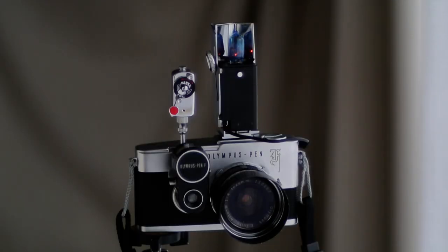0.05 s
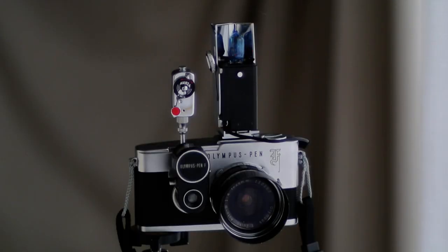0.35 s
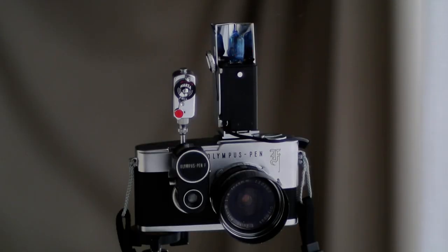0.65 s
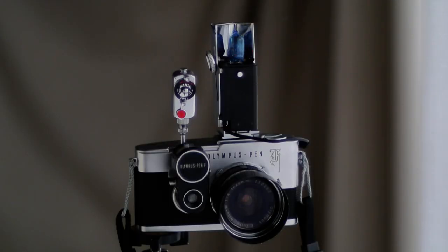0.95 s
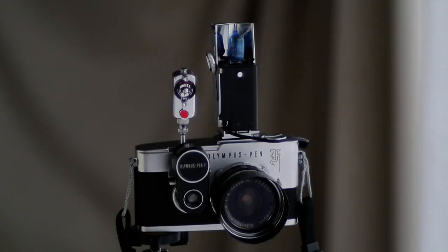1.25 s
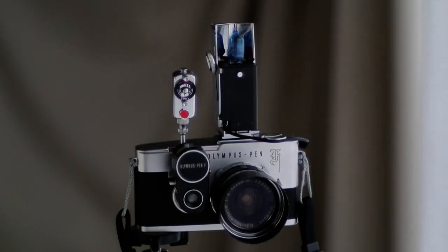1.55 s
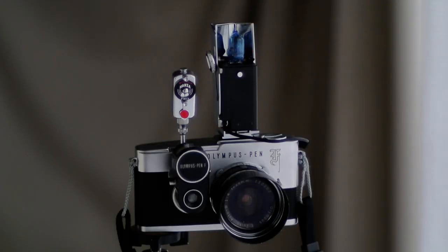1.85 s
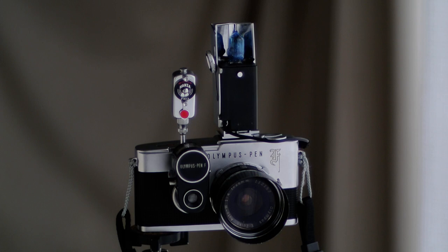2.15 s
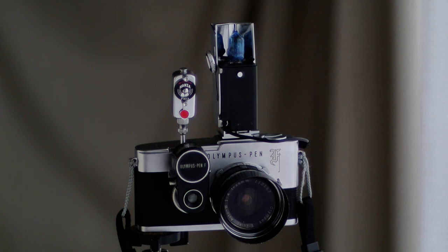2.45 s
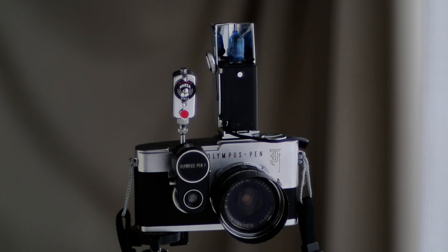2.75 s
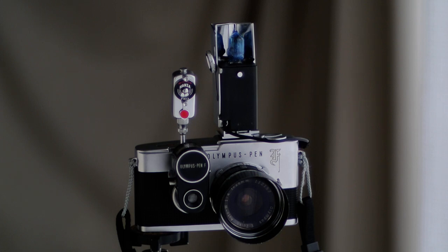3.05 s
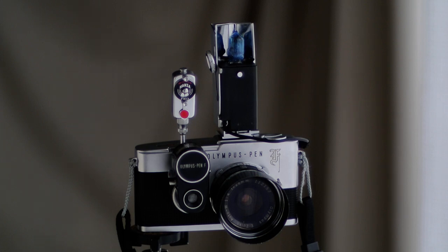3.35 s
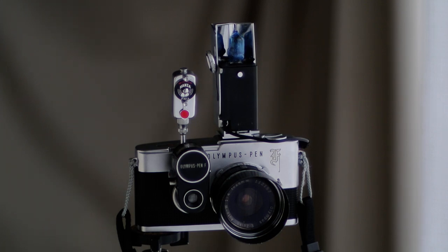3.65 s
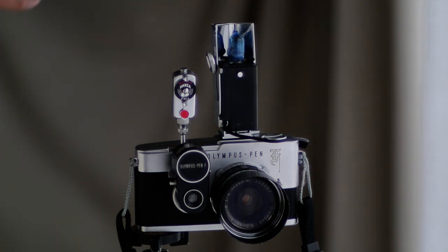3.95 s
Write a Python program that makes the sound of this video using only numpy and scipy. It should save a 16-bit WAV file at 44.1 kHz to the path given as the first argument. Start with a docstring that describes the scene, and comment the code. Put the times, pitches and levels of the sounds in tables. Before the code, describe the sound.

A camera's clockwork self-timer runs with a fast, hissing buzz, and the shutter snaps sharply partway through. The buzz stops, leaving quiet room tone, then two small clicks, a soft rustle and a dull knock.

```python
"""A camera's clockwork self-timer runs down in a quiet room, its escapement a fast, hissing buzz.
Its plunger trips the shutter, after which the camera body rings along until the spring stops.
Then come two small clicks, a soft rustle and a dull knock, over room tone, a faint low hum
and a thin whine. Ticks and clicks are coloured noise bursts; case and knock add ringing modes."""
import sys
import numpy as np
from scipy import signal
from scipy.fft import rfft, irfft
from scipy.io import wavfile

SR = 44100
rng = np.random.default_rng(int(sys.argv[2]) if len(sys.argv) > 2 else 0)


def wav_record(signal):
    """Record a signal, one row per channel, as 16-bit PCM in the file named by sys.argv[1]."""
    frames = np.transpose(np.atleast_2d(signal))
    bounded = np.clip(frames, -1, 1)
    # unit amplitude maps onto the largest positive 16-bit level
    quanta = np.round(bounded * 32767).astype(np.int16)
    wavfile.write(sys.argv[1], SR, quanta)


N = 176400
T = np.arange(N) / SR
FFT_SIZE = 2 ** 18
HZ = np.fft.rfftfreq(FFT_SIZE, 1 / SR)


def amp(db):
    """Decibels to gain."""
    return 10 ** (np.asarray(db) / 20)


def curve(rows, column=1):
    """One column of a time table as an automation curve."""
    rows = np.array(rows)
    return np.interp(T, rows[:, 0], rows[:, column])


def over_hz(points):
    """Breakpoints joined by straight lines over log frequency."""
    hz, value = np.transpose(points)
    return np.interp(np.log(HZ + 1), np.log(hz), value)


def panned(db):
    """Stereo gains for a pan in dB, left minus right."""
    return amp(np.array([[.5], [-.5]]) * db)


def coloured(x, eq):
    """Minimum-phase EQ: nothing rings ahead of an attack."""
    cepstrum = irfft(np.log(amp(over_hz(eq))))
    cepstrum[1:FFT_SIZE // 2] *= 2
    cepstrum[FFT_SIZE // 2 + 1:] = 0
    return irfft(rfft(x, FFT_SIZE) * np.exp(rfft(cepstrum)))[..., :N]


def noise(correlation):
    """White stereo noise: correlation 0 is wide, 1 is mono."""
    mid, side = rfft(rng.standard_normal((2, FFT_SIZE)))
    mid *= np.sqrt((1 + correlation) / 2)
    side *= np.sqrt((1 - correlation) / 2)
    return irfft([mid + side, mid - side])[:, :N]


def resonance(x, hz, width_hz):
    """Two-pole resonator with unity gain at its peak."""
    radius = np.exp(-np.pi * width_hz / SR)
    feedforward = np.array([1, 0, -1]) * (1 - radius ** 2) / 2
    feedback = [1, -2 * radius * np.cos(2 * np.pi * hz / SR), radius ** 2]
    return signal.lfilter(feedforward, feedback, x + 1e-18)


def decay(age, t60_s):
    """Exponential decay that starts at age 0."""
    return (age >= 0) * amp(-60 * np.clip(age / t60_s, 0, 5))


def echoed(x, response):
    """Convolves each channel with a response scaled to unit energy."""
    energy = np.sum(response ** 2, axis=1, keepdims=True)
    return signal.fftconvolve(x, response / np.sqrt(energy), axes=1)[:, :N]


def in_room(x, wet_db):
    """The room adds a short diffuse tail, mono in the bass and wide on top."""
    # stereo image of the tail: freq_hz, correlation
    image = [(300, 1), (900, 1), (2000, 0.24), (6000, 0)]
    predelay_s = .0044
    tail = noise(over_hz(image))[:, :SR // 2] * decay(T[:SR // 2] - predelay_s, t60_s=.18)
    return x + amp(wet_db) * echoed(x, tail)


def room_tone():
    """A steady bed of dark air, nearly mono in the lows."""
    # colour of the air: freq_hz, gain_db
    eq = [(20, -1), (26, -8), (32, -11), (42, 7.5), (50, 1), (60, 1), (78, -4), (100, 3), (160, 0),
          (400, 0.5), (900, -2), (1600, -3.5), (3000, -6.5), (7000, -8.5), (16000, -11)]
    # its stereo image: freq_hz, correlation
    image = [(40, 0.98), (90, .6), (160, 0.18), (400, 0.1), (700, 0.17), (2000, 0.05), (10000, 0.019)]
    return amp(-40.5) * coloured(noise(over_hz(image)), eq) * panned(.63)


def whine():
    """A thin, steady band of noise far to the left."""
    band = resonance(rng.standard_normal(N), hz=1123, width_hz=3)
    return amp(-71.5) * band / band.std() * panned(18)


def hum():
    """A faint low sine fades in and sinks in pitch."""
    # path of the hum: time_s, pitch_hz, rms_db
    glide = [(1.5, 83.9, -100), (2.05, 82.3, -80), (2.3, 82.5, -63), (2.55, 84.8, -62), (2.8, 82, -66),
             (3.1, 81.3, -64), (3.35, 77, -74), (3.65, 73.3, -63), (4, 72.4, -64)]
    phase = 2 * np.pi * np.cumsum(curve(glide)) / SR
    return np.sqrt(2) * amp(curve(glide, column=2)) * np.sin(phase)


def rustle():
    """Soft noise swells up towards the end."""
    # swell: time_s, level_db
    swell = [(3.1, -77), (3.24, -56.5), (3.4, -56.5), (3.47, -58.5), (3.57, -53), (3.74, -53.5),
             (3.84, -58), (3.93, -55), (3.99, -50)]
    # colour of the rustle: freq_hz, gain_db
    eq = [(100, 4.5), (600, 12.5), (1100, 9), (1750, 7), (2180, 13.5), (2600, 7), (4100, 7), (7000, 5),
          (11000, 5), (16000, -2)]
    return coloured(amp(curve(swell)) * noise(correlation=.23), eq) * panned(-.8)


def clack(bursts, eq, correlation, pan_db):
    """A quick run of fast-dying noise bursts."""
    power = sum((amp(db) * decay(T - start_s, t60_s)) ** 2 for start_s, db, t60_s in bursts)
    return panned(pan_db) * coloured(np.sqrt(power) * noise(correlation), eq)


def clicks():
    """Two small clicks of three contacts each, one dry, one hollow."""
    # contacts: start_s, level_db, t60_s
    dry_hits = [(2.942, -39, .02), (2.9452, -38.5, 0.028), (2.9485, -32, 0.0084)]
    hollow_hits = [(3.3828, -47, .035), (3.3872, -41, 0.029), (3.3903, -38.5, 0.019)]
    # click colours: freq_hz, gain_db
    dry_eq = [(200, -9), (1500, 1), (2100, 9.5), (2800, 4), (3400, 6), (5000, 2.5), (8000, 2), (12000, -6),
              (16000, -6)]
    hollow_eq = [(150, 0), (500, 5), (950, 12), (1600, -3), (2600, 1.5), (3450, 13), (4400, 5), (5500, -17),
                 (7500, 2), (11000, 0), (16000, -12)]
    dry_click = clack(dry_hits, dry_eq, correlation=.26, pan_db=-1)
    return dry_click + clack(hollow_hits, hollow_eq, correlation=.48, pan_db=-1.1)


def knock():
    """A dull knock rings briefly, followed by a few quick, fainter echoes."""
    # knock and its early echoes: start_s, level_db, t60_s
    arrivals = [(3.6238, -33, 0.031), (3.6285, -39.5, 0.08), (3.638, -42.5, 0.032), (3.654, -41, 0.038),
                (3.668, -43, 0.017)]
    # colour of the impact: freq_hz, gain_db
    eq = [(50, 1), (120, 8), (180, -4), (270, 17), (370, 7), (520, 14.5), (720, 19.5), (1050, 11.5),
          (1400, 15), (2400, 1), (3600, 4), (7000, 0), (12000, -3), (16000, -12)]
    # ringing modes: pitch_hz, gain_db, t60_s
    modes = [(279.6, -15, .15), (484, -10, .1), (581, -2, 0.068), (728, -1, 0.053), (874, -6, 0.05),
             (1300, -9, 0.079), (1490, -11, 0.028)]
    ring = np.zeros(N)
    for start_s, level_db, _ in arrivals:
        after = T >= start_s
        age = T[after] - start_s
        for hz, mode_db, t60_s in modes:
            gain = amp(level_db + mode_db) * rng.choice([-1, 1])
            ring[after] += gain * decay(age, t60_s) * np.sin(2 * np.pi * hz * age)
    return ring + clack(arrivals, eq, correlation=.7, pan_db=-1.5)


def shutter():
    """The tripped shutter snaps in a tight, bright cluster of contacts."""
    # contacts: start_s, level_db, t60_s
    hits = [(.4735, -24, 0.029), (.4752, -45, 0.034), (.4795, -8.5, 0.0045), (.4803, -14.5, 0.016),
            (.4822, -16.5, 0.021), (.4838, -14, 0.016), (.4893, -34, 0.014)]
    # colour of the snap: freq_hz, gain_db
    eq = [(100, -13), (330, -24), (480, -4.5), (660, -8.5), (830, 7), (1000, 1), (1200, -2), (1450, -8),
          (1700, -0.5), (2100, -6), (2800, -7), (3500, -6.5), (4200, -3), (5000, -3.5), (6000, 3.5),
          (8500, 2.5), (10000, 7.5), (11500, 5), (16000, -3)]
    return clack(hits, eq, correlation=.5, pan_db=-2.5)


def scattered(x):
    """Nearby surfaces throw the treble back within milliseconds."""
    response = rng.standard_normal((2, SR // 20)) * decay(T[:SR // 20], t60_s=.025)
    treble = signal.sosfilt(signal.butter(2, 6000, "high", fs=SR, output="sos"), x)
    return x + amp(-10) * echoed(treble, response)


def blurred(force):
    """Countless reflections leave a faint haze behind each tick."""
    tail = decay(T[:SR // 2], t60_s=.17) ** 2
    haze_power = np.abs(signal.fftconvolve(force ** 2, tail / tail.sum())[:N])
    return np.sqrt(force ** 2 + amp(-7.5) ** 2 * haze_power)


def escapement(stop_s, fade_s):
    """Envelope of uneven pallet beats and loose rattles; rms 1 until the spring stops."""
    beat_hz, jitter, rattles_per_s = 246.7, .13, 1400
    gaps, accents = rng.standard_normal((2, 600))
    beats = (np.cumsum(np.exp(jitter * gaps)) / beat_hz * SR).astype(int)
    rattles = rng.random(N) < rattles_per_s / SR
    blows = rattles * amp(-1.5 - rng.standard_normal(N))
    blows[beats[beats < N]] += amp(-2 * accents[beats < N])
    tick = decay(T[:SR // 20], t60_s=.0019)
    power = signal.fftconvolve(blows ** 2, tick ** 2)[:N]
    running = np.clip((stop_s - T) / fade_s + 1, 0, 1)
    return np.sqrt(np.abs(power) / power[T < stop_s].mean()) * running


def timer():
    """Ticks shake the case; the colour shifts as the plunger seats on the camera."""
    # strength of the escapement: time_s, relative_db
    drive = [(0, -29), (.1, -30), (.17, -31.5), (.38, -31.5), (.48, -31), (.63, -30.5), (.85, -31),
             (.95, -29.5), (1.04, -32), (1.19, -28.5), (1.28, -32), (1.38, -29)]
    # tick colour, plunger free and seated: freq_hz, gain_db
    free_eq = [(150, -28.5), (500, -15.5), (850, -14.5), (1400, -17.5), (2300, -5), (4200, -7.5),
               (7300, -5.5), (8800, -0.5), (12000, 0), (16000, -4)]
    seated_eq = [(150, -19.5), (550, -18), (1150, -17), (1600, -17), (2300, -6), (3100, -8), (3900, -15),
                 (4600, -10), (5300, -12), (5800, -5.5), (7400, -3.5), (8500, 0), (11000, -0.5),
                 (16000, -4.5)]
    # stereo balance of the ticks: freq_hz, pan_db
    balance = [(800, 2), (2600, -2), (5600, -1.5), (7500, -.5), (10000, 3.5), (11200, 0), (12500, -2),
               (14000, -6), (15300, 7)]
    # resonances of timer and camera: pitch_hz, width_hz, free_db, seated_db, pan_db
    modes = [(728, 36, -35, -5, 0), (821, 53, -6.5, -0.5, -0.5), (2260, 200, -20, -10.5, -3),
             (2644, 210, -18, -5.5, 5), (2880, 240, -12, -13, -3), (5600, 160, -10, -6, 2),
             (6580, 180, -5, 3, -1.5), (8800, 220, -8, -4, -1), (9980, 450, -3, 2.5, 3),
             (11300, 280, -4, 3, 1), (12330, 130, -9, 4.5, -5), (12200, 140, -2, -16, -17),
             (13240, 160, -3, 4, -3), (13430, 130, -2, -2, 1), (13600, 200, -10, 1, -8),
             (14470, 180, 8.5, 5, -7)]
    midpoint_s, crossfade_s, correlation = .55, .22, .49
    seated = np.clip((T - midpoint_s) / crossfade_s + .5, 0, 1)
    force = blurred(escapement(stop_s=1.3727, fade_s=.013) * amp(curve(drive) + .5))
    ticks = force * noise(correlation)
    buzz = coloured(ticks * (1 - seated), free_eq) + coloured(ticks * seated, seated_eq)
    buzz = irfft(rfft(buzz, FFT_SIZE) * panned(over_hz(balance)))[:, :N]
    for hz, width_hz, free_db, seated_db, pan_db in modes:
        shake = force * amp(free_db + (seated_db - free_db) * seated)
        buzz += panned(pan_db) * resonance(shake * noise(correlation), hz, width_hz)
    return buzz


def scene():
    """Timer, shutter, clicks and knock share one room over a quiet bed."""
    snap, small_clicks = shutter(), clicks()
    camera = in_room(scattered(timer()), wet_db=0) + in_room(snap, wet_db=-6.5)
    taps = in_room(small_clicks, wet_db=-2.5) + in_room(knock(), wet_db=-5)
    return camera + taps + room_tone() + rustle() + hum() + whine()


def record(dry):
    """A steep low-pass cuts the very top."""
    cutoff_hz = 15780
    return signal.sosfilt(signal.ellip(12, .1, 80, cutoff_hz, fs=SR, output="sos"), dry)


dry = scene()
out = record(dry)
wav_record(out)
```